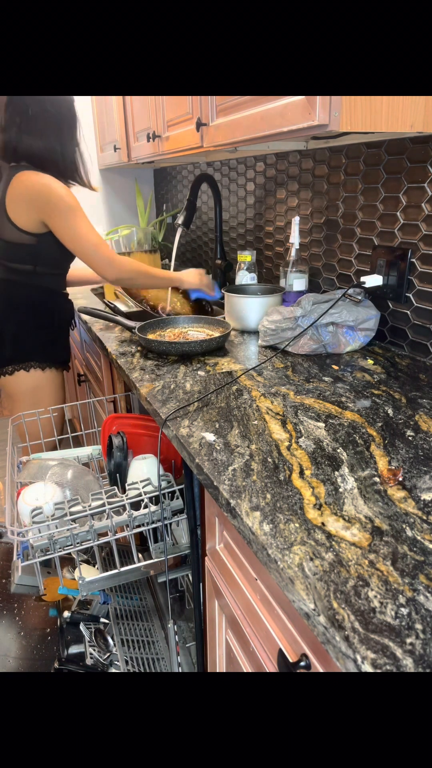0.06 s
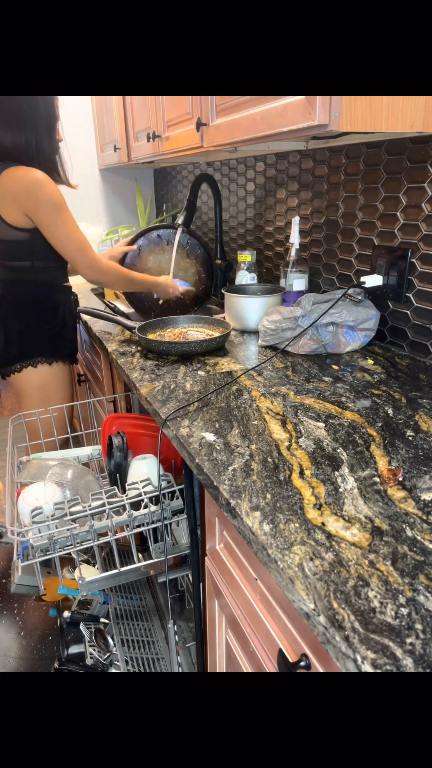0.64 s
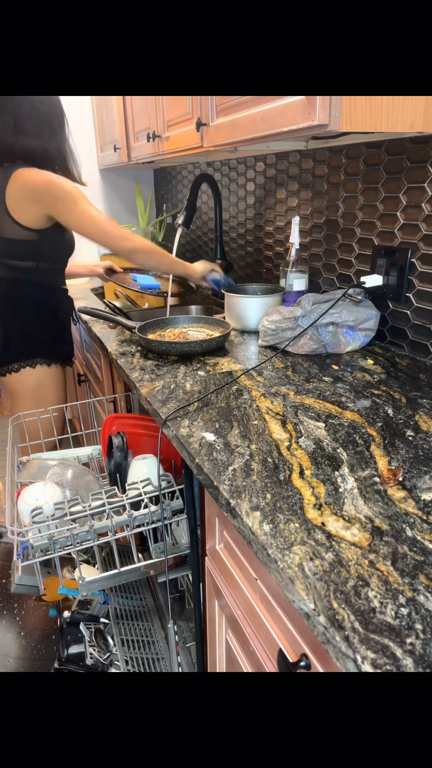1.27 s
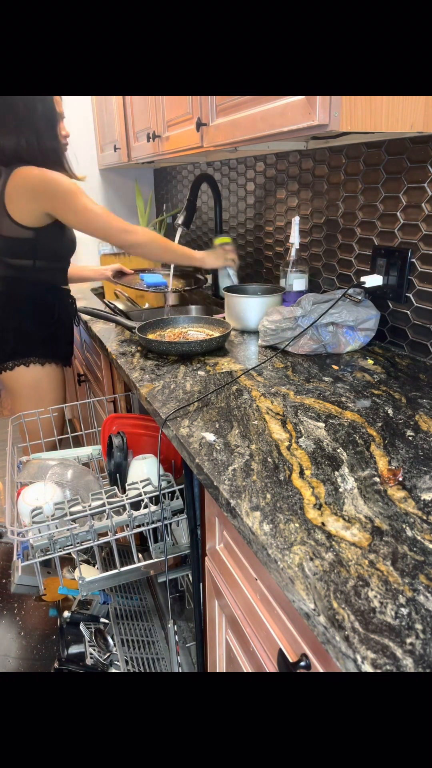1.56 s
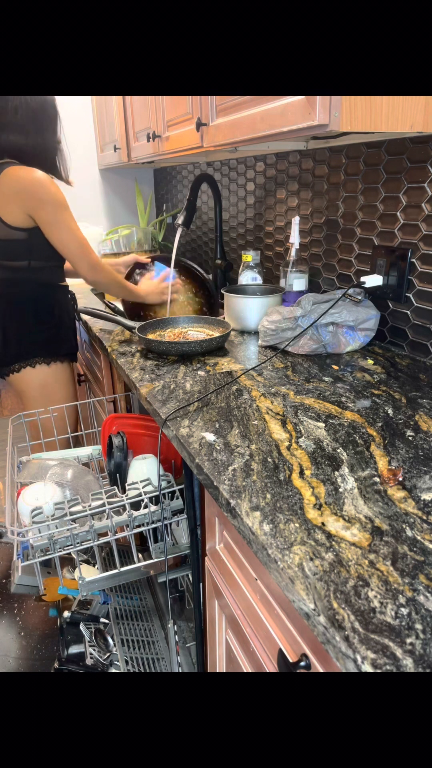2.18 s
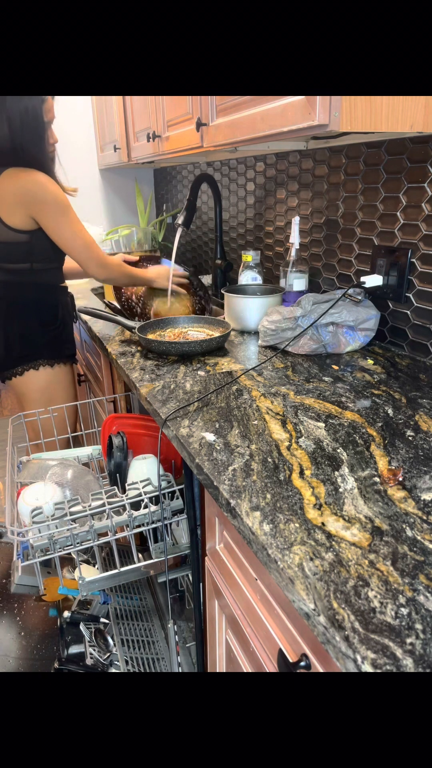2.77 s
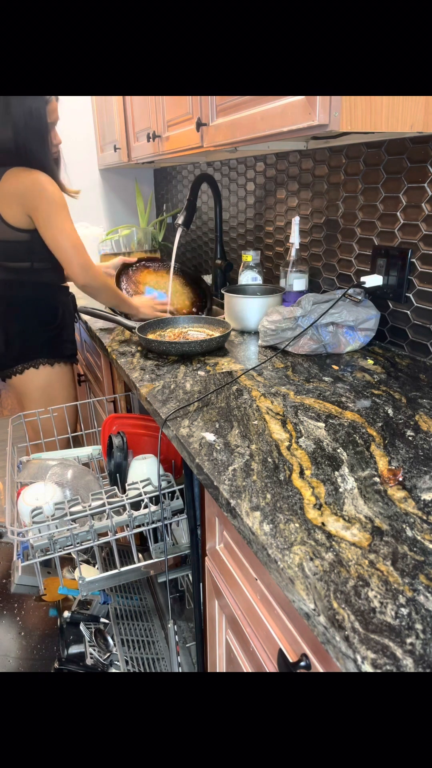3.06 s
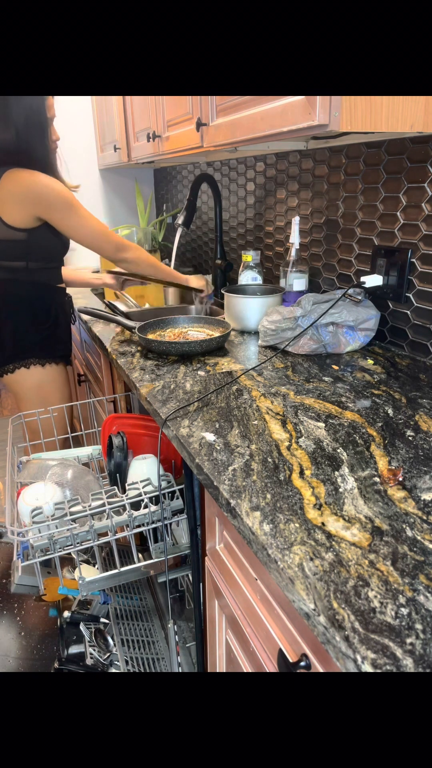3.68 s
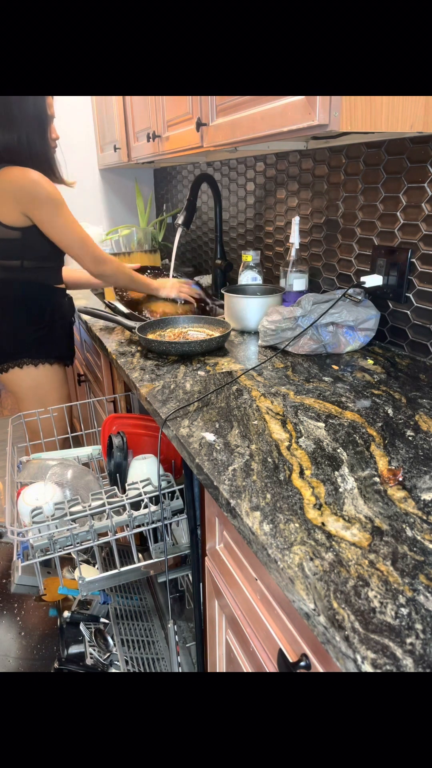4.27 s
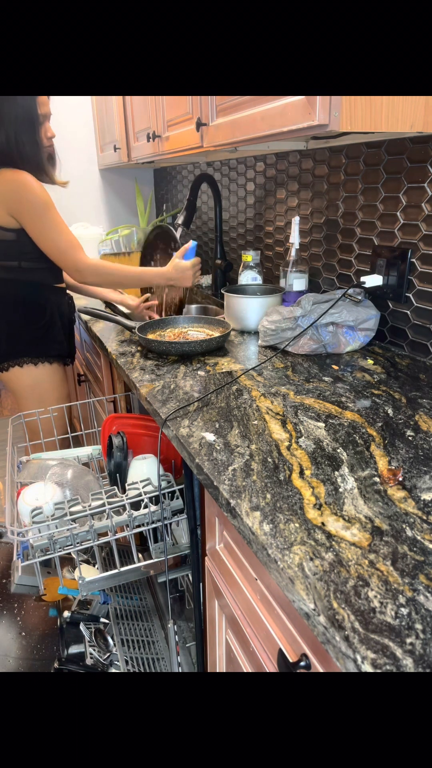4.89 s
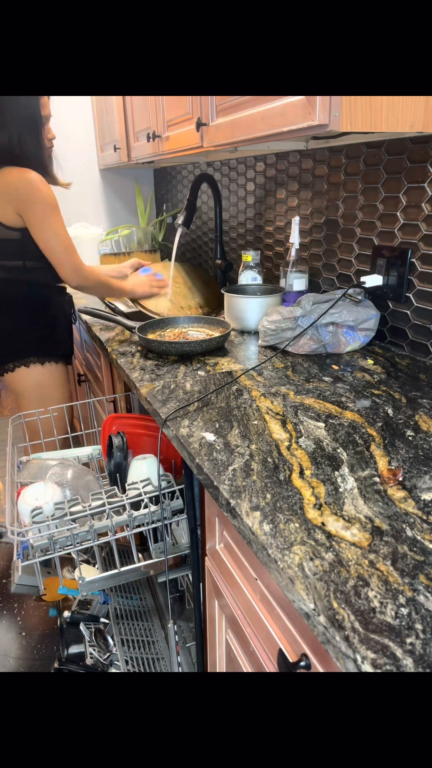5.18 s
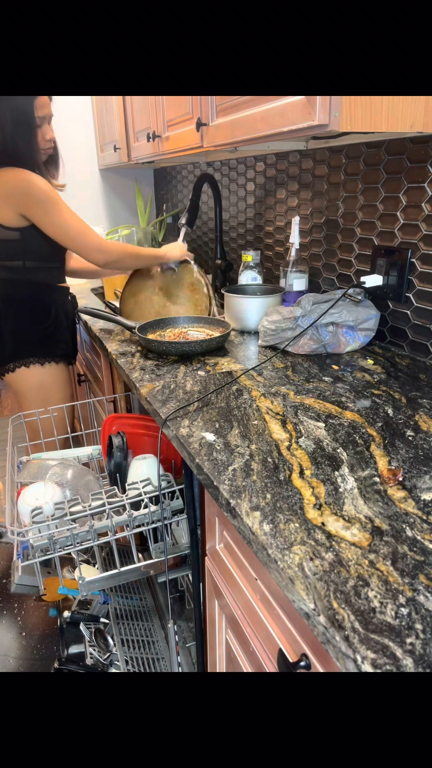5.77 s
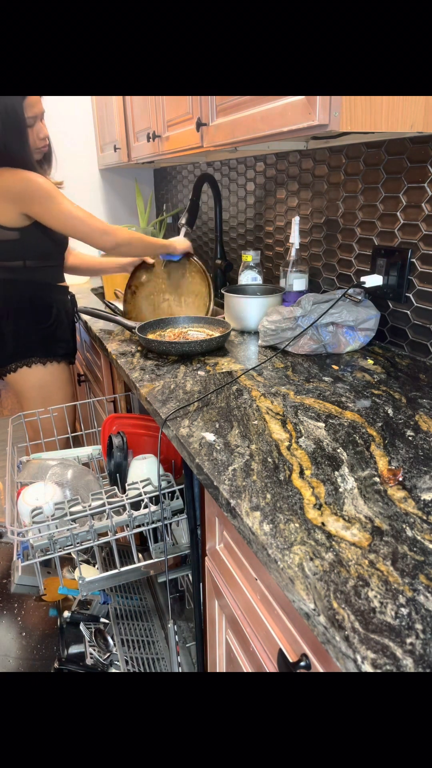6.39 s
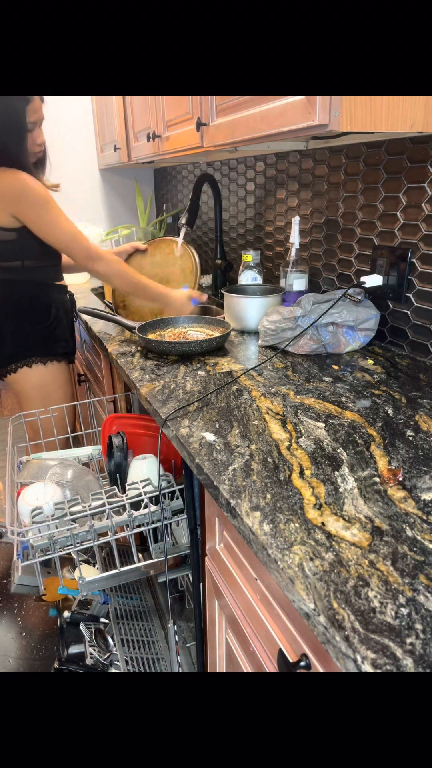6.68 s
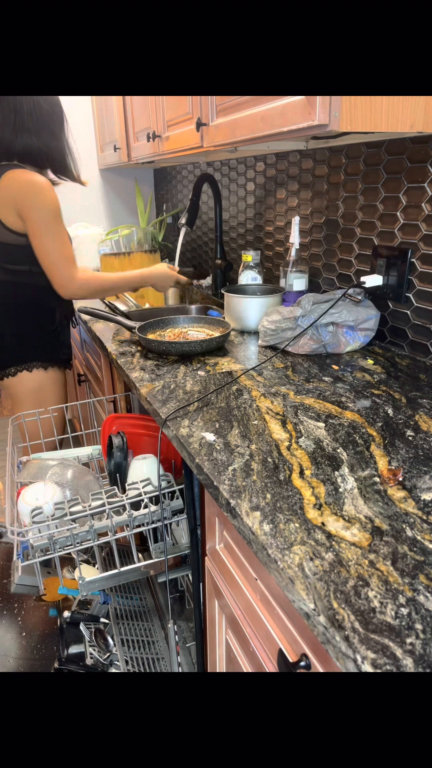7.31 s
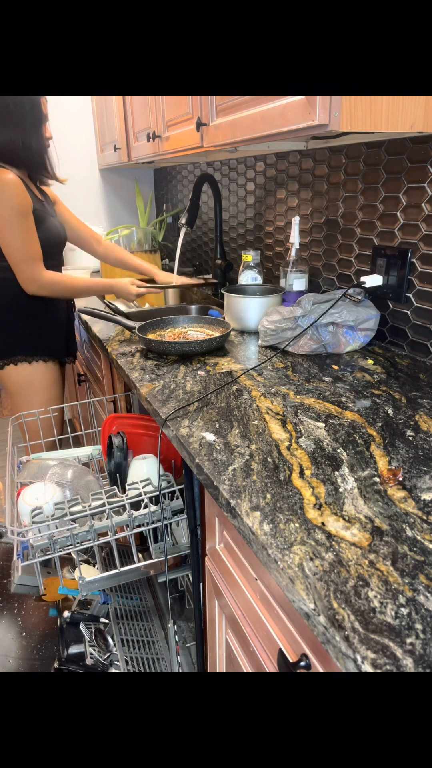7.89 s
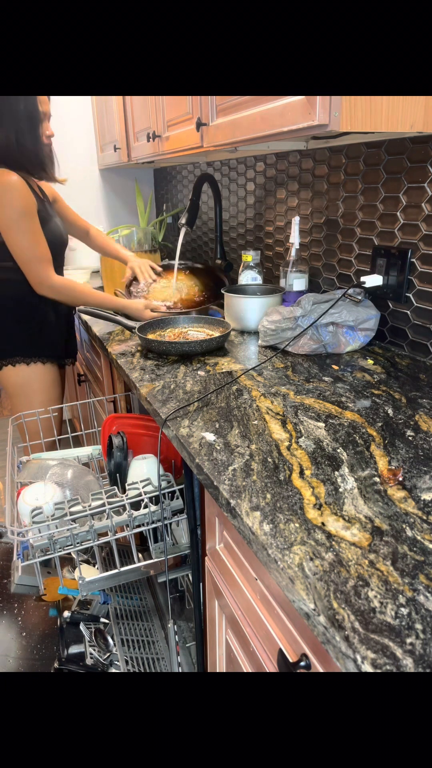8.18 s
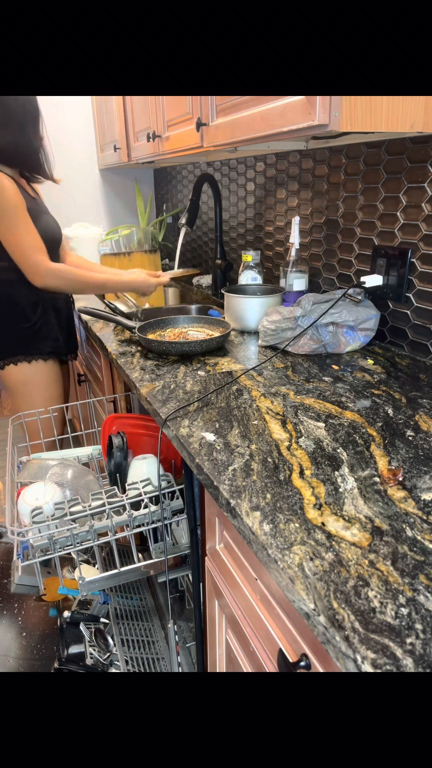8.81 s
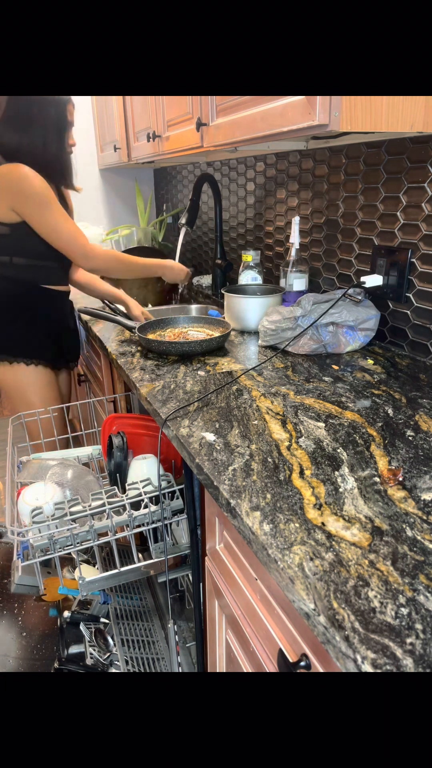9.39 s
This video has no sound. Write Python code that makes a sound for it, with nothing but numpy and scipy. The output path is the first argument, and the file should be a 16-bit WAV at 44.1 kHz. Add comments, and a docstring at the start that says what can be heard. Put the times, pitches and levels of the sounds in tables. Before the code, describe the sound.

A kitchen tap runs and spatters while a metal pan is scrubbed with a sponge, clanking and thumping against the sink.

```python
"""Washing a pan in the sink

A tap runs while a big round pan is scrubbed with a sponge, rinsed and turned over. The stream hisses,
and its many tiny drops spatter on the metal. The pan knocks against the basin, which thumps while the
pan clanks and rings, and at last it is set down on a pot. One microphone stands a little way off in a
small, well damped kitchen."""
import sys
import numpy as np
from scipy import signal
from scipy.fft import rfft, irfft, next_fast_len
from scipy.io import wavfile

SR = 44100
rng = np.random.default_rng(int(sys.argv[2]) if len(sys.argv) > 2 else 0)


def to_wav(sig):
    """Store sig (one row per channel, or 1-D mono) as 16-bit WAV at the path in sys.argv[1].

    Samples outside -1..1 are clipped; the rate is SR.
    """
    pcm = np.clip(np.atleast_2d(sig), -1, 1) * 32767
    pcm = np.round(pcm).astype(np.int16)
    wavfile.write(sys.argv[1], SR, pcm.T)  # frames by channels


N = 416744
TIME = np.arange(N) / SR

# Levels are relative, and t60 is the time a sound takes to fade by 60 dB.
# Tone colours, or how strong each frequency is in a noise: f/Hz, level/dB
JET_COLOUR = [(2500, -17), (4500, -4.5), (6500, -3), (9000, -2.5), (11500, -10.5), (13500, -7.5),
              (15500, -10)]   # water leaving the tap
SPRAY_COLOUR = [(1180, -11.5), (2000, -8), (2890, -7), (3150, -2.5), (3580, -0.5), (4320, 2), (5590, 2.5),
                (7290, -4.5), (13600, -10), (15500, -19)]   # fine spray where it lands
PATTER_COLOUR = [(280, -12), (400, 2), (520, 0), (700, 3.5), (1000, 0.5), (1600, -1), (2200, -4),
                 (3200, -4)]   # drops on the pan
DRUMMING_COLOUR = [(30, -53), (65, -20), (100, -16), (140, -6.5), (185, -0.5), (240, 1), (300, 4.5),
                   (380, -1.5), (550, -6.5)]   # the stream on the basin
SPLASH_COLOUR = [(400, -9), (900, -8.5), (1500, -13), (2500, -1), (3500, 1), (5000, 4), (7000, -1),
                 (10000, -8.5), (15500, -13)]   # a sheet of water slapping down
SPONGE_COLOUR = [(1200, -13), (2000, -8.5), (2900, -4), (3500, -1), (4400, 3.5), (5600, 3), (7300, -3.5),
                 (13600, -13), (15500, -14)]   # the swish of the sponge
THUMP_COLOUR = [(30, -52), (62, -54), (100, -42), (140, -16), (185, 2.5), (240, 3.5), (300, -12.5),
                (400, -25)]   # the struck basin
CLANK_COLOUR = [(250, -33), (340, -7), (450, -2.5), (540, -5), (640, 5.5), (780, 5), (880, 2), (1140, 4),
                (1400, -0.5), (1630, 1), (1900, -6), (2400, -9), (4000, -27)]   # the struck body of the pan
CLASH_COLOUR = [(1400, -15), (2200, -0.5), (3000, 2.5), (3600, 0.5), (4400, 2), (5500, 0), (7000, -8),
                (10000, -14.5), (15500, -29.5)]   # its struck rim

# Modes, the notes a thing rings with when struck: f/Hz, level/dB, t60/s
PAN_MODES = [(694, -5, 0.25), (829, -3, 0.14), (1071, 0, 0.14), (1174, -9.5, 0.42), (1631, -20, 0.28),
             (1863, -14, 0.2), (2369, -18, 0.33), (2632, -19, 0.32), (2891, -11, 0.2), (3155, -13, 0.17),
             (3822, -18, 0.29), (4240, -1, 0.13), (4385, -4, 0.16), (4656, -11, 0.2), (5184, -16, 0.33),
             (5599, -10, 0.13), (8032, -29, 0.27)]
POT_MODES = [(754, 0, 0.3), (1007, -11, 0.28), (1195, 0, 0.15), (1346, -13, 0.37), (1534, -15, 0.34),
             (1879, -25, 0.42), (2186, -11, 0.15), (2783, -14, 0.18), (4393, -15, 0.18)]
BASIN_FLOOR_MODES = [(148.3, -14, 0.13), (181, -5, .1), (233.1, 5, 0.1), (252, 7, 0.021)]
SINK_AIR_MODES = [(400, -1.5, 0.13), (450.4, -6, 0.21), (519.5, 1.5, 0.1)]
SINK_WALL_MODES = [(220, -6.5, 0.15), (253.3, -3, 0.12), (294, -12, 0.14)]

# the spray's hiss, following the slow tilting of the pan: t/s, level/dB
SPRAY_LEVELS = [(0, -51), (0.25, -50), (0.6, -55.5), (0.84, -47), (1.08, -56), (1.27, -55), (1.45, -46),
                (1.65, -52), (2.0, -48), (2.85, -50.5), (3.5, -48.5), (3.8, -51.5), (4.7, -50.5),
                (6.9, -55), (7.1, -51), (8.55, -50), (8.94, -54), (9.1, -46)]
# times when the stream falls square on the pan: start/s, end/s, gain/dB
UNDER_THE_TAP = [(0.18, 0.954, 6), (1.975, 2.22, 6.5), (2.4, 2.853, 1), (5.362, 5.75, 2.5), (7.64, 7.85, 3),
                 (8.38, 8.62, 5.5), (9.008, 9.5, 9.5)]
# sheets of water thrown off the tilting pan: t/s, level/dB, t60/s
SPLASHES = [(0.155, -28.5, 0.14), (1.1648, -33.5, 0.14), (1.3, -28.5, 0.26), (1.375, -31, 0.5),
            (1.5379, -26.5, 0.2), (2.507, -32, 0.3), (5.3333, -29.5, 0.36), (6.977, -26.5, 0.16),
            (7.654, -30.5, 0.3), (8.125, -32, 0.25), (8.4894, -27, 0.21)]
# a wet hand rubbing the pan: t/s, half length/s, f/Hz, level/dB
HAND_RUBS = [(0.465, 0.058, 1640, -60), (3.687, 0.021, 2900, -51), (7.756, 0.018, 1730, -55),
             (8.687, 0.031, 1720, -62)]
# the middle of each sponge stroke: t/s, level/dB
SPONGE_STROKES = [(0.335, -45.5), (0.41, -44.5), (0.49, -48), (0.545, -49.5), (0.876, -49), (0.94, -50),
                  (1.245, -55), (1.47, -55), (2.05, -50), (2.14, -48.5), (2.285, -50.5), (2.425, -46),
                  (2.59, -50), (2.67, -50), (2.755, -46), (2.895, -47), (3.03, -48), (3.13, -45),
                  (3.225, -47.5), (3.355, -47), (3.41, -48), (3.515, -48), (3.635, -46.5), (3.925, -46.5),
                  (4.13, -44.5), (4.295, -47), (4.455, -44), (4.595, -45.5), (4.79, -55), (7.04, -45),
                  (7.195, -70), (7.5, -53), (7.8, -53), (7.86, -51), (8.04, -46.5), (8.22, -49),
                  (8.375, -47.5), (8.44, -48), (8.57, -46.5), (8.8, -49.5), (9.04, -43.5), (9.14, -49)]
# soft bumps against the thin side wall of the sink: t/s, level/dB
WALL_BUMPS = [(0.16, -53.5), (1.086, -45.5), (3.464, -41), (3.674, -51), (3.74, -53), (4.912, -41.5)]
# the pan bounces clear and sings one note: t/s, level/dB, f/Hz, t60/s
TINGS = [(0.662, -35.5, 1006, 0.36), (1.899, -28.5, 1254, 0.11), (6.245, -39, 751, 0.28),
         (6.911, -44, 955, 0.2), (9.215, -31, 797, 0.25)]
# blows: t/s, level/dB, basin offset/dB, rim offset/dB, base t60/s, base rise time/s, struck note f/Hz
PAN_ON_BASIN = [(0.162, -44, -15, -10, 0.23, .024, 1014), (0.659, -21.5, -10.5, 4.5, 0.22, .032, 682),
                (0.81, -44.5, -13, 4, 0.19, .05, 776), (1.694, -38, 2.5, -8.5, 0.11, 0.027, 455),
                (1.832, -49, -4, -1, 0.11, .032, 736), (1.897, -26.5, -6, 4.5, .13, .031, 4370),
                (2.05, -30.5, -9, -17, 0.16, 0.025, 645), (2.17, -39, -24, -18, .16, 0.033, 790),
                (2.599, -49, -8.5, -3, 0.6, .031, 762), (3.464, -41.5, -1.5, 7, 0.11, 0.033, 633),
                (3.856, -41, -8.5, -14, 0.18, .068, 810), (4.046, -31.5, -8, 2.5, .14, 0.038, 2960),
                (4.182, -46, -2, 1.5, .09, .014, 1450), (4.337, -33.5, -11.5, -16, 0.28, 0.045, 684),
                (4.491, -36.5, -9, -19, .21, 0.063, 569), (4.912, -36, -17, 1, .2, .025, 642),
                (5.464, -33, -10, -13, 0.22, 0.089, 514), (5.534, -39.5, -16, -13, .16, 0.058, 923),
                (5.826, -31.5, -11.5, -2, .22, 0.027, 885), (5.997, -25.5, -16, -1.5, 0.11, 0.036, 1650),
                (6.099, -37, -13, -5.5, 0.21, 0.021, 740), (6.235, -27, -11.5, -1.5, 0.24, .054, 1147),
                (6.338, -29.5, -12, -1.5, 0.23, 0.016, 1145), (6.451, -34, -11.5, -6, 0.26, 0.026, 983),
                (6.624, -33.5, -17, -2, 0.19, 0.068, 1107), (6.825, -26, -7, -1.5, 0.15, 0.039, 444),
                (6.879, -37.5, -18, -2.5, 0.21, 0.062, 775), (7.268, -29, -22, -20, 0.19, 0.032, 776),
                (8.144, -49, -16, 2, 0.13, 0.093, 1410), (8.457, -39, -18, 2.5, 0.37, 0.039, 408),
                (8.969, -36, -11.5, -3.5, 0.11, 0.012, 1750)]
PAN_ON_POT = [(9.094, -45.5, -10, -2, 0.61, .06, 1046), (9.209, -26, -26, -1, 0.22, 0.14, 1184),
              (9.237, -28.5, -38, -3, 0.24, .087, 770), (9.333, -35, -13.5, 0, 0.17, 0.073, 704)]


def from_db(db):
    """Turn decibels into a factor to multiply by."""
    return 10 ** (np.asarray(db) / 20)


def rms_one(x):
    """Scale a signal so that its average strength (rms) is 1."""
    return x / np.sqrt(np.mean(x ** 2) + 1e-20)


def fade(age, t60):
    """Stay at 1 until age 0, then fall by 60 dB every t60 seconds."""
    return np.exp(-np.log(1000) * np.maximum(age, 0) / t60)


def swell(middle, half_length):
    """A smooth rise and fall of height 1."""
    return np.exp(-np.minimum(((TIME - middle) / half_length) ** 2, 100))


def colour(x, spectrum):
    """Give a noise a tone colour; beyond the table's ends it drops 30 dB an octave."""
    hz, db = np.transpose(spectrum)
    size = next_fast_len(len(x))
    octave = np.log2(np.maximum(np.arange(size // 2 + 1) * SR / size, 1))
    outside = np.abs(octave - np.clip(octave, np.log2(hz[0]), np.log2(hz[-1])))
    gain = from_db(np.interp(octave, np.log2(hz), db) - 30 * outside)
    return rms_one(irfft(rfft(x, size) * gain, size)[:len(x)])


def drift(per_s):
    """A random wander that turns about per_s times a second."""
    points = rng.standard_normal(4000)
    return rms_one(np.interp(TIME * per_s, np.arange(len(points)), points))


def ring(clicks, hz, t60):
    """Each click starts a fading tone as strong as itself."""
    decay = fade(1 / SR, t60)
    step = 2 * np.pi * hz / SR
    return signal.lfilter([0, np.sin(step)], [1, -2 * decay * np.cos(step), decay ** 2], clicks + 1e-18)


def drops(per_s, spread_db):
    """Drops land as clicks at random moments: many small, a few large."""
    sizes = from_db(spread_db * np.minimum(rng.exponential(1, N), 4))
    return sizes * rng.choice([-1, 1], N) * (rng.random(N) < per_s / SR)


def level_onset(x, age):
    """Scale a blow to rms 1 over its first 25 ms."""
    onset = x[(age > 0) & (age < 0.025)]
    return x / np.sqrt(np.mean(onset ** 2) + 1e-20)


def free_ring(modes, age, rise_s, chance_db):
    """A struck thing rings on; each blow gives each mode a different strength."""
    hz, db, t60 = np.transpose(modes)[:, :, None]
    since = np.maximum(age, 0)
    strength = from_db(db + chance_db * rng.standard_normal(hz.shape))
    phase = 2 * np.pi * (hz * since + rng.random(hz.shape))
    tones = strength * np.sin(phase) * fade(age, t60)
    return level_onset(tones.sum(axis=0) * (1 - np.exp(-since / rise_s)), age)


def add_at(track, t, sound):
    """Mix a sound into the track, starting at t seconds."""
    start = round(t * SR)
    track[start:start + len(sound)] += sound[:N - start]


def kitchen(x, echo_db, t60):
    """Add a short, dull echo from tiles and cupboards."""
    age = TIME[:SR // 2]
    echo = rng.standard_normal(len(age)) * fade(age, t60) * (age > 0.004)
    echo = signal.sosfilt(signal.butter(1, 5000, fs=SR, output="sos"), echo)
    return x + from_db(echo_db) * signal.fftconvolve(x, echo / np.linalg.norm(echo))[:N]


def surges(per_s, drain_s):
    """The stream breaks unevenly over the pan: sudden jumps in level that drain away."""
    slaps = rng.random(N) < per_s / SR
    level = signal.lfilter([1], [1, -np.exp(-1 / (drain_s * SR))], slaps)
    return rms_one(level - level.mean())


def drumming():
    """The stream drums on the basin with a low, wavering rumble."""
    return from_db(-61 + drift(per_s=6.8)) * colour(drops(per_s=1500, spread_db=1.5), DRUMMING_COLOUR)


def jet(surge):
    """The jet from the tap gives a high, almost steady hiss."""
    return from_db(-55.5 + 0.47 * surge) * colour(rng.standard_normal(N), JET_COLOUR)


def bubbles(cycles=60, sizes=18):
    """Trapped air rings briefly, each bubble at the pitch of its size."""
    births = drops(per_s=350, spread_db=2.5)
    size = rng.integers(0, sizes, N)
    pitches_hz = np.geomspace(514, 2650, sizes)
    return rms_one(sum(ring(births * (size == k), hz, cycles / hz) for k, hz in enumerate(pitches_hz)))


def patter(surge, swing_s=0.02):
    """Drops and bubbles patter on the pan, louder when it swings into the stream."""
    pattering = colour(drops(per_s=4500, spread_db=2), PATTER_COLOUR) + from_db(-9) * bubbles()
    boost_db = sum(db * (np.tanh((TIME - start) / swing_s) - np.tanh((TIME - end) / swing_s)) / 2
                   for start, end, db in UNDER_THE_TAP)
    return from_db(-61 + boost_db + 0.27 * surge) * pattering


def spray(surge):
    """Where the stream lands, countless droplets blur into a hiss."""
    level_db = np.interp(TIME, *np.transpose(SPRAY_LEVELS)) + 2.1 * surge
    return from_db(level_db) * colour(drops(per_s=24000, spread_db=2.5), SPRAY_COLOUR)


def splashes(rise_s=0.0034):
    """Each sheet of thrown water lands at once and drains away."""
    gain = np.zeros(N)
    for t, level_db, t60 in SPLASHES:
        age = np.maximum(TIME - t, 0)
        gain += from_db(level_db - 11) * (1 - np.exp(-age / rise_s)) * fade(age, t60)
    return gain * colour(drops(per_s=14000, spread_db=3.2), SPLASH_COLOUR)


def hand_rubs(width_hz=130):
    """Skin sticks and slips on wet metal: a faint, hoarse note."""
    out = np.zeros(N)
    t60 = np.log(1000) / (np.pi * width_hz)
    for t, half_length, hz, level_db in HAND_RUBS:
        slips = rms_one(ring(rng.standard_normal(N), hz, t60))
        out += from_db(level_db) * slips * swell(t, half_length)
    return out


def sponge(surge, half_stroke_s=0.038):
    """Each stroke squeezes a swish of fine droplets across the pan."""
    power = sum((from_db(db) * swell(t, half_stroke_s)) ** 2 for t, db in SPONGE_STROKES)
    swish = colour(drops(per_s=20000, spread_db=3.5), SPONGE_COLOUR)
    return np.sqrt(power) * from_db(0.86 * surge) * swish


def water():
    """All the wet sounds together; all but the jet echo in the kitchen."""
    surge = surges(per_s=70, drain_s=0.017)
    stream = spray(surge) + patter(surge) + drumming()
    hiss = jet(surge)
    washing = sponge(surge) + splashes() + hand_rubs()
    return kitchen(stream + washing, echo_db=-16, t60=0.39) + hiss


def wall_bumps():
    """A soft bump sets only the low modes of the sink wall ringing."""
    out = np.zeros(N)
    for t, level_db in WALL_BUMPS:
        boom = free_ring(SINK_WALL_MODES, TIME[:SR // 3], rise_s=0.01, chance_db=3.5)
        add_at(out, t, from_db(level_db) * boom)
    return out


def tings(split=0.0413):
    """The freed pan sings one note, which the handle splits into two close tones that throb."""
    out = np.zeros(N)
    for t, level_db, hz, t60 in TINGS:
        pair = [(hz, 0, t60), (hz * (1 - split), -4, t60)]
        ting = free_ring(pair, TIME[:SR // 2], rise_s=0.0023, chance_db=-3)
        add_at(out, t, from_db(level_db) * ting)
    return out


def burst(spectrum, age, rise_s, t60, tail_db, tail_t60):
    """The noise of a blow swells quickly to its peak; most dies at once, a little lingers."""
    shape = fade(-age, rise_s) * (fade(age, t60) + from_db(tail_db) * fade(age, tail_t60))
    return level_onset(shape * colour(rng.standard_normal(len(age)), spectrum), age)


def blows(table, modes, thump_db, air_db, clank_db, clash_db, ring_db, note_db, note_hold):
    """Every blow shakes the basin, the pan's body and its rim, and leaves the metal ringing."""
    out = np.zeros(N)
    age = TIME[:SR * 2 // 5] - 0.05   # start early to leave room for the swell
    for t, level_db, basin_db, rim_db, t60, rise_s, note_hz in table:
        # the heavy basin answers a little later than the pan
        thump = burst(THUMP_COLOUR, age - 0.007, rise_s * 0.77 + 0.023, t60 * 0.64,
                      tail_db=-33, tail_t60=0.2)
        clank = burst(CLANK_COLOUR, age - 0.003, rise_s * 0.9, t60, tail_db=-37, tail_t60=0.52)
        clash = burst(CLASH_COLOUR, age - 0.003, rise_s * 0.9, t60 * 0.71, tail_db=-17.5, tail_t60=0.38)
        floor = free_ring(BASIN_FLOOR_MODES, age, rise_s=0.014, chance_db=7.5)
        air = free_ring(SINK_AIR_MODES, age, rise_s=0.0038, chance_db=4.5)
        metal = free_ring(modes, age, rise_s=0.0037, chance_db=4.5)
        # the struck spot favours one note; the handle splits it in two
        pair = [(note_hz, 0, t60 * note_hold), (note_hz * 0.96, -8, 0.2)]
        note = free_ring(pair, age, rise_s=0.00082, chance_db=0.5)
        lift_db = 0.17 * max(-31 - (level_db + basin_db), 0)   # light thumps are raised a little
        looseness = min(t60 / 0.22, 1) ** 2.05   # a firm grip (short t60) chokes the ring
        blow = (from_db(basin_db + thump_db + lift_db - 1.5) * thump
                + from_db(clank_db) * clank
                + from_db(rim_db + clash_db) * clash
                + from_db(basin_db + thump_db - 3.5) * floor
                + from_db(air_db - 0.52 * rim_db) * air   # a flat blow pumps more air than a rim blow
                + from_db(ring_db + 0.99 * rim_db) * looseness * metal
                + from_db(note_db) * note)
        add_at(out, t + age[0], from_db(level_db) * blow)
    return out


def scene():
    """Water and metal reach one microphone, alike in both channels."""
    knocks = blows(PAN_ON_BASIN, PAN_MODES, thump_db=-0.5, air_db=-20, clank_db=-6.5, clash_db=-4.5,
                   ring_db=-8.5, note_db=-10, note_hold=0.74)
    set_down = blows(PAN_ON_POT, POT_MODES, thump_db=4, air_db=-32, clank_db=-7.5, clash_db=-4.5,
                     ring_db=-1, note_db=-9, note_hold=0.99)
    return np.tile(water() + wall_bumps() + tings() + knocks + set_down, (2, 1))


def record(dry):
    """The small microphone loses the deep bass; the highest treble is cut steeply."""
    bass_cut = signal.butter(2, 45, "high", fs=SR, output="sos")
    treble_cut = signal.ellip(12, 0.1, 70, 15800, fs=SR, output="sos")
    return signal.sosfilt(treble_cut, signal.sosfilt(bass_cut, dry))


dry = scene()
out = record(dry)
to_wav(out)
```